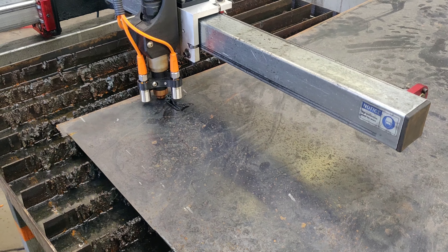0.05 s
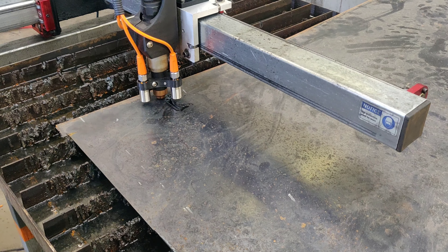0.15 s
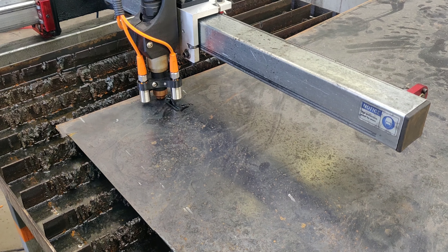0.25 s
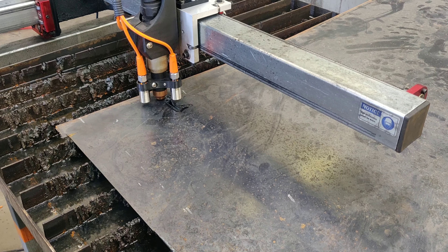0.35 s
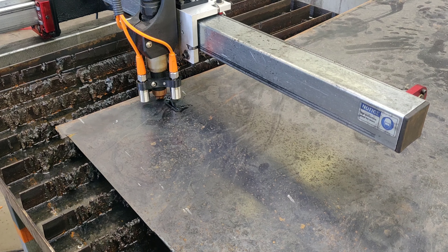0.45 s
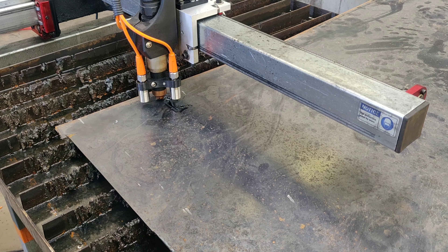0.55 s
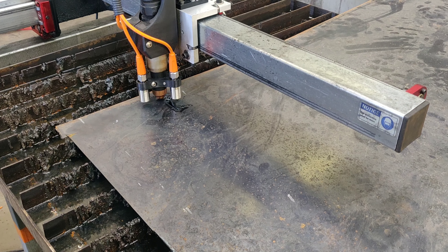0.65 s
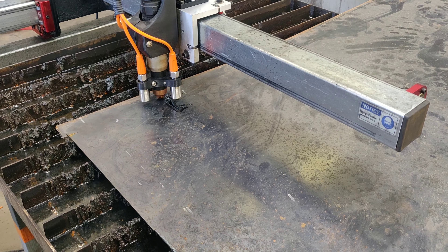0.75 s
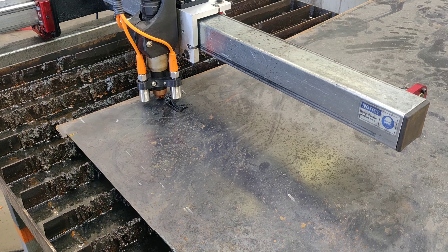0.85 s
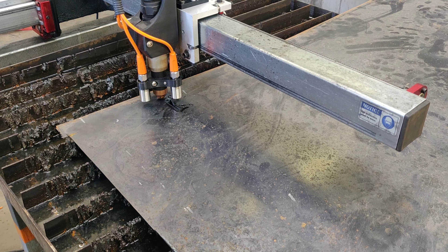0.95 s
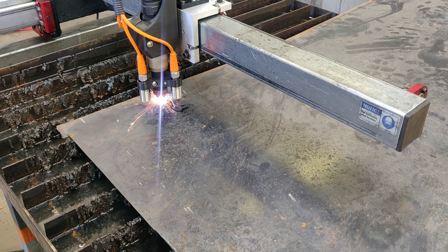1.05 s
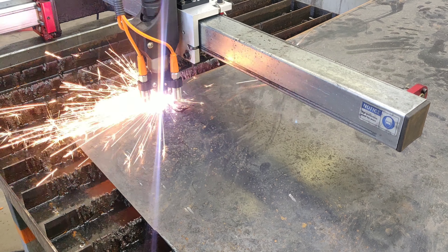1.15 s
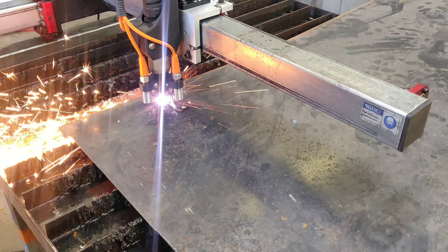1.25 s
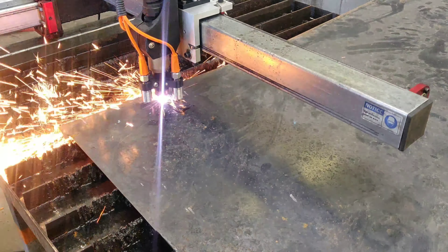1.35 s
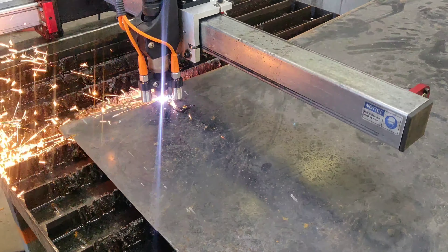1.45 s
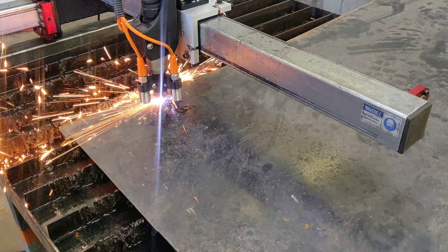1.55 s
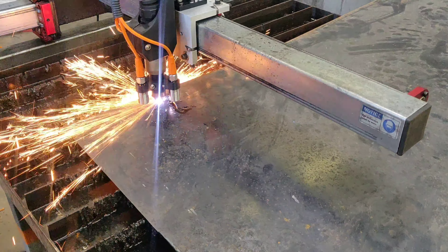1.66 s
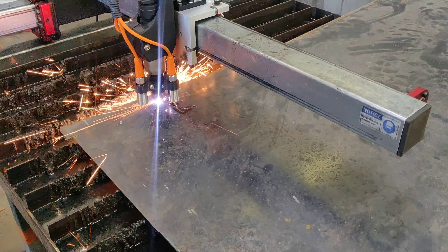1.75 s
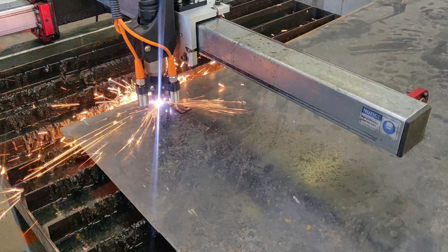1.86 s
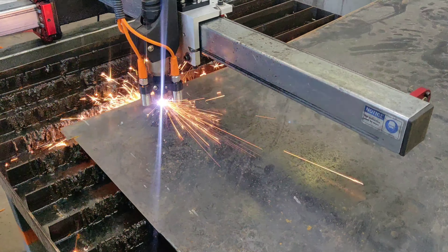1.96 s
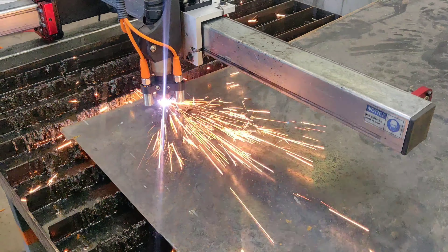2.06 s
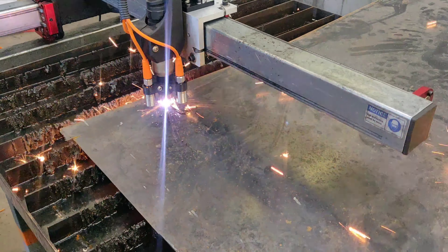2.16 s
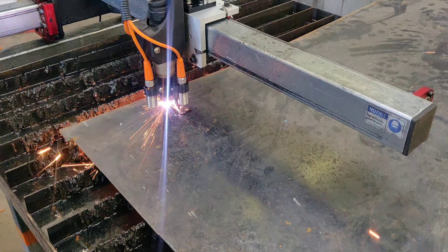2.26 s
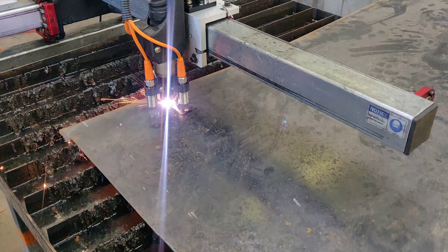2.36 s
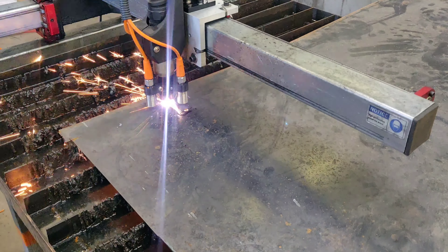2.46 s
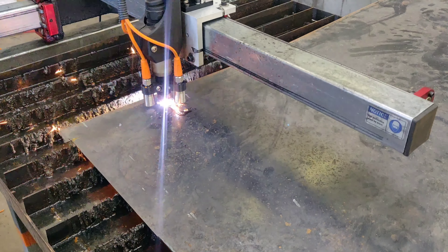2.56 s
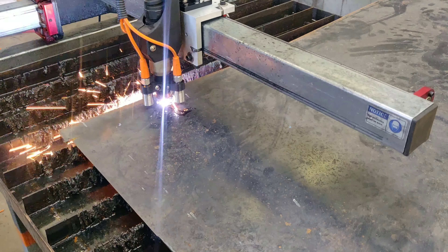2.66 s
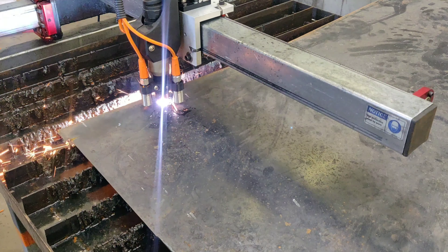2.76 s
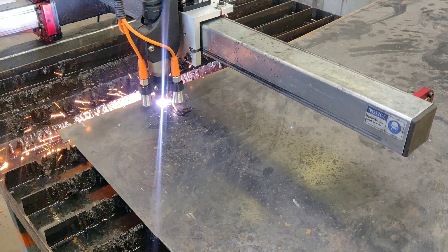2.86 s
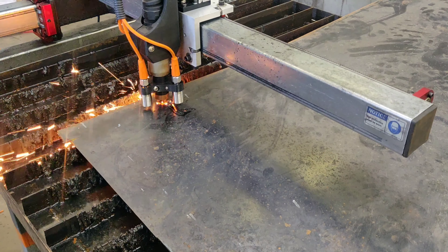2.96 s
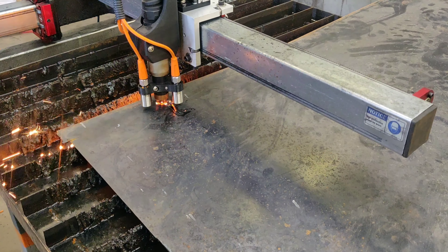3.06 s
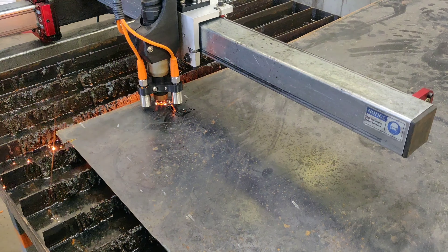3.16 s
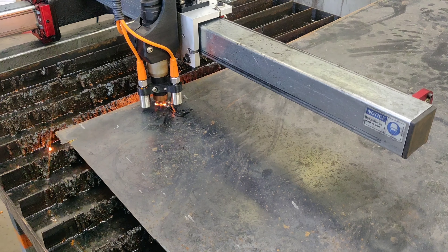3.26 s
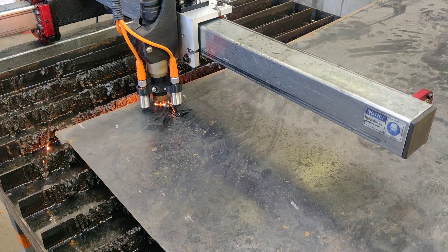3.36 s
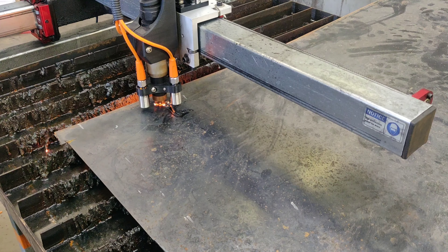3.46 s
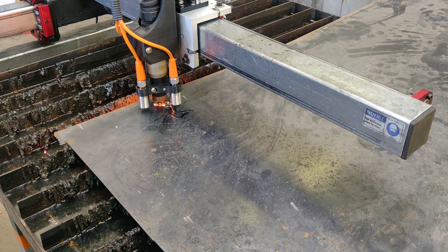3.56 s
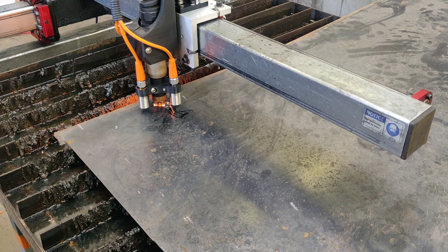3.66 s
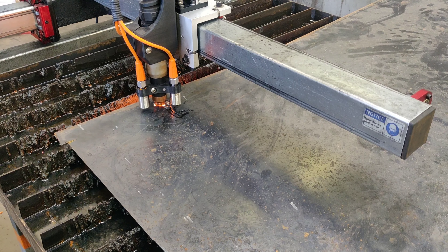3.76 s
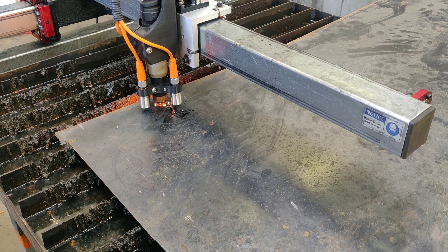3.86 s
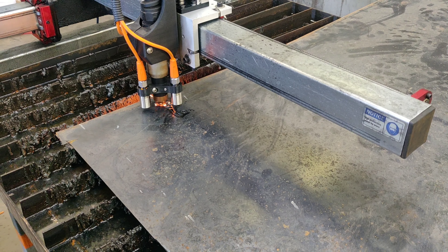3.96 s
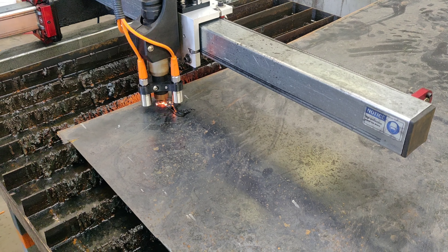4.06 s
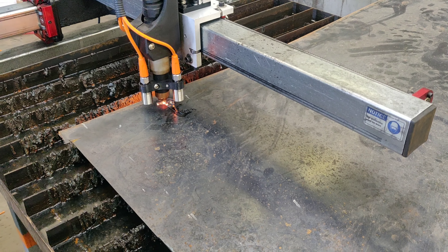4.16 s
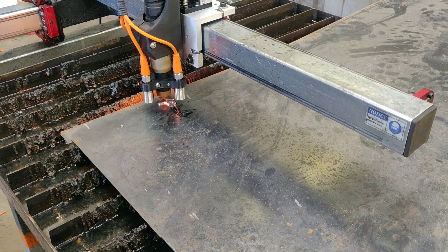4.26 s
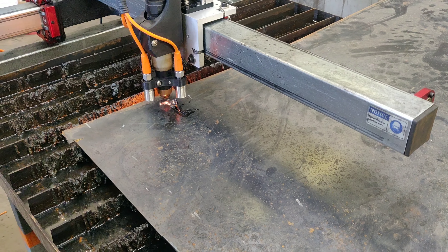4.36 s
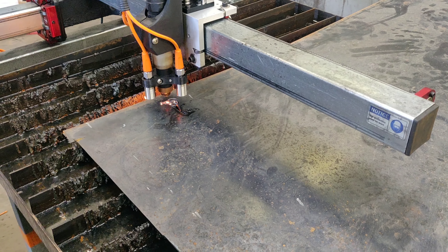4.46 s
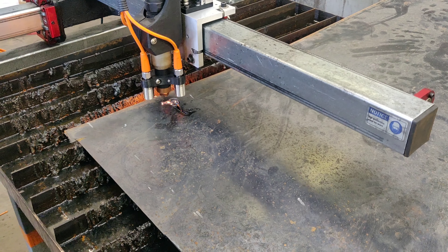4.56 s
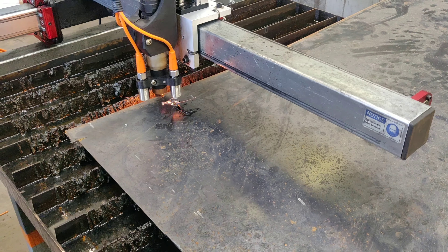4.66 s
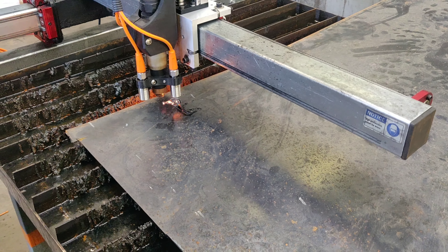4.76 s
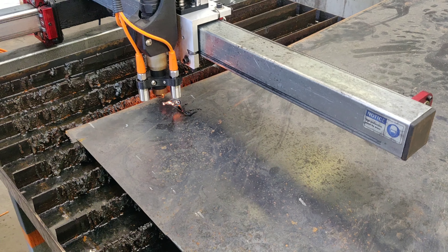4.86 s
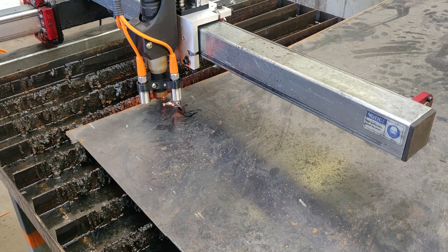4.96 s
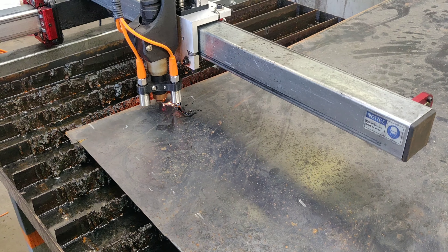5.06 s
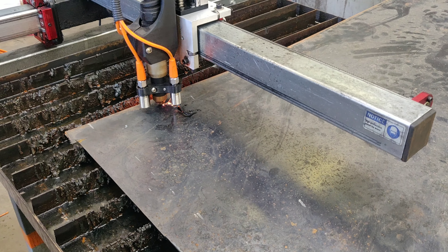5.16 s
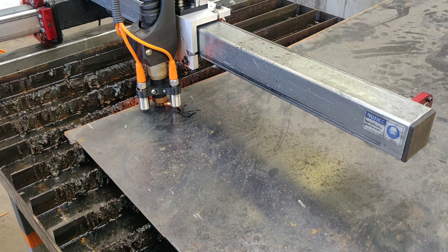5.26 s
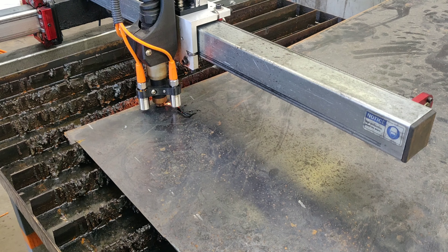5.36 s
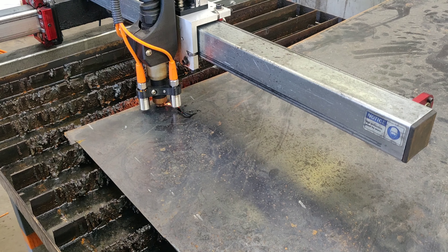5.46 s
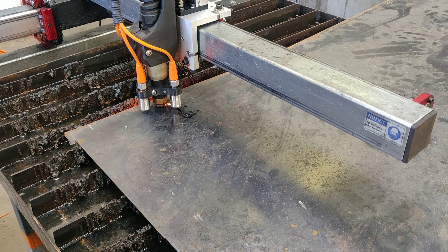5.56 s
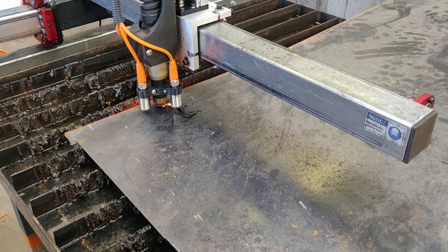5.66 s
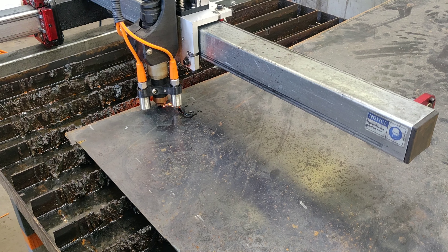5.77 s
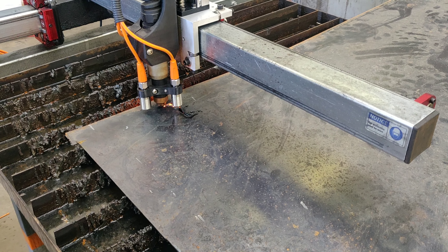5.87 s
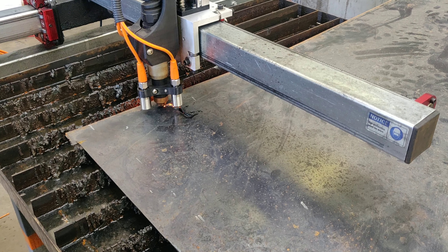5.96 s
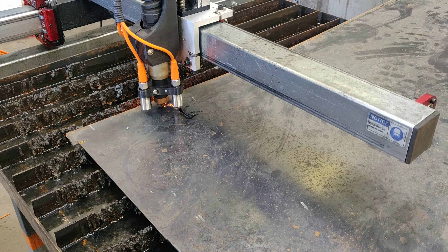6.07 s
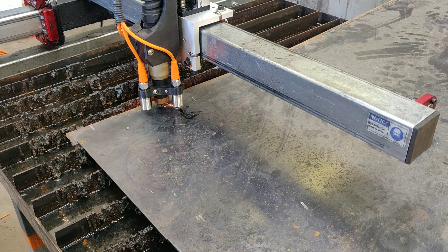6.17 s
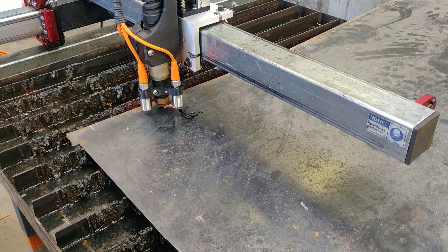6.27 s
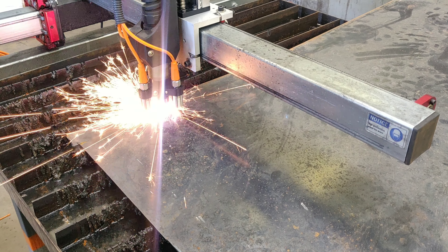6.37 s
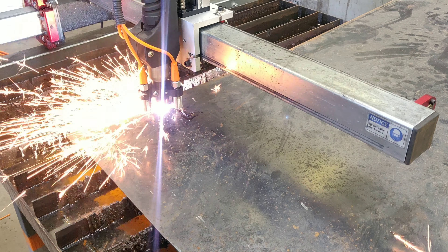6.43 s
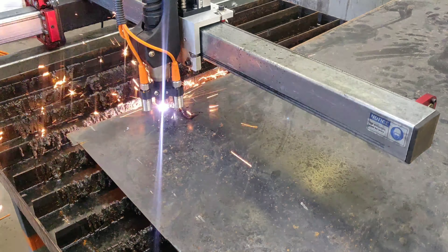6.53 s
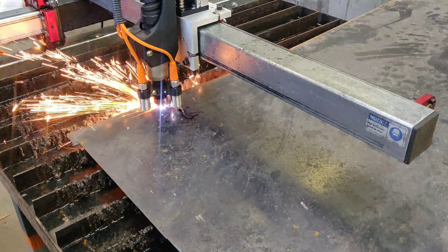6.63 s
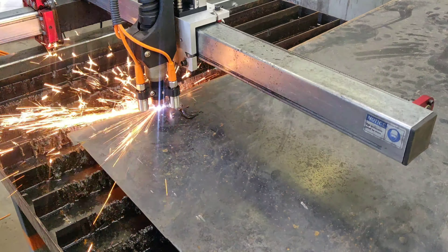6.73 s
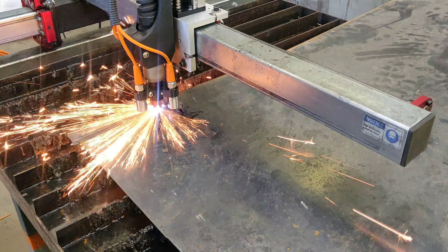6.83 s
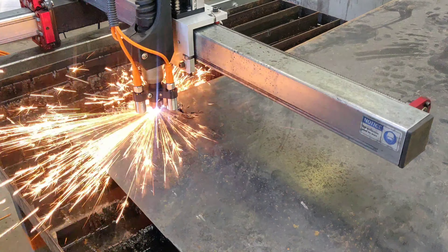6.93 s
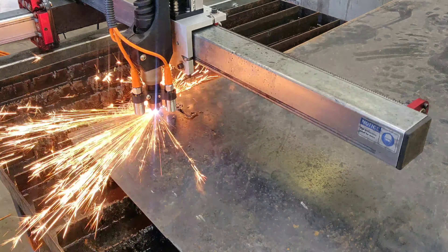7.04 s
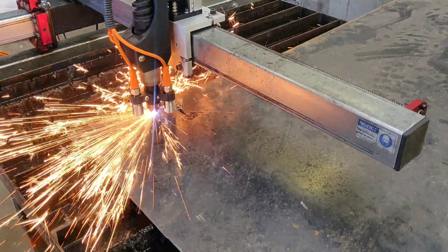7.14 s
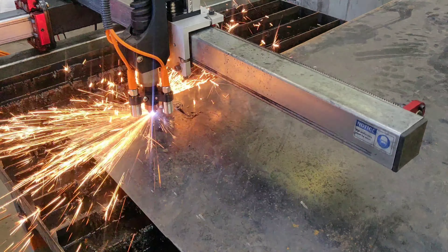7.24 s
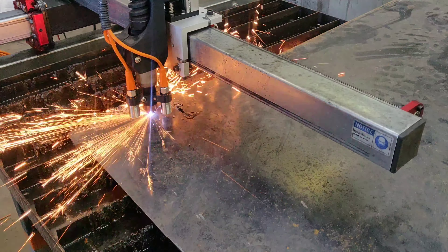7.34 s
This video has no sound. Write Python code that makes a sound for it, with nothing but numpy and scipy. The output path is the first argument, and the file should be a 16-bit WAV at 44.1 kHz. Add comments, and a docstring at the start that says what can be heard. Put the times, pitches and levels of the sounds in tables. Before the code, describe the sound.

Close stereo view of a plasma torch over a steel plate in a workshop. Compressed air hisses and bleeds away over low machine hum, then a sharp snap starts a fierce sizzling, sputtering roar for about two seconds. It drops to a breathy, whistling air hiss that rushes briefly, then dies down. A second snap, thump and roar run to the end.

```python
"""Cold air hisses from a plasma torch over a workshop hum, then bleeds away; the torch cuts steel plate twice.
Air, arc and kerf are coloured noise at two microphone ports; hum, drones and whistle are wavering tones.
Each arc strikes with a snap, pierces, sputters and roars; the cold jet hisses and whistles between the cuts.
The blast pushes mostly on the right port; gain control ducks the whole sound when it is loud."""
import sys
import numpy as np
from scipy import signal
from scipy.fft import rfft, irfft
from scipy.io import wavfile
from scipy.ndimage import uniform_filter1d

SR = 44100
rng = np.random.default_rng(int(sys.argv[2]) if len(sys.argv) > 2 else 0)


def master_out(mix):
    """Clip the mix to full scale and print it as 16-bit PCM to the path in sys.argv[1]."""
    frames = np.transpose(np.atleast_2d(mix))
    ceiling = np.clip(frames, -1, 1)
    pcm = np.round(ceiling * 32767).astype(np.int16)
    wavfile.write(sys.argv[1], SR, pcm)


N = 326340
TIME = np.arange(N) / SR
FRAME, HOP = 512, 128  # samples
FRAME_S = np.arange(N // HOP + 5) * HOP / SR
BIN_HZ = np.fft.rfftfreq(FRAME, 1 / SR)


def gain_of(db):
    """Decibels to amplitude."""
    return 10 ** (np.asarray(db) / 20)


def evened(x):
    """Scales to rms 1."""
    return x / np.sqrt(np.mean(x ** 2) + 1e-20)


def curve(table, t):
    """Linear interpolation of a two-column table over time."""
    return np.interp(t, *np.transpose(table))


def read(table, hz):
    """Every column of a spectrum table, interpolated over log frequency."""
    table_hz, *columns = np.transpose(table)
    return [np.interp(np.log(hz + 1), np.log(table_hz + 1), column) for column in columns]


def wander(hz):
    """Slow random modulation of rms 1, up to about hz."""
    f = np.fft.rfftfreq(N, 1 / SR)
    spectrum = rfft(rng.standard_normal(N)) / (1 + (f / hz) ** 4)
    return evened(irfft(spectrum, N))


def gate(start, end, rise, fall):
    """One between two times, with straight ramps; the fall is centred on the end."""
    return np.clip((TIME - start) / rise, 0, 1) * np.clip((end - TIME) / fall + .5, 0, 1)


def bell(centre_hz, octaves):
    """A smooth band on the frame bins."""
    return np.exp(-.5 * (np.log2((BIN_HZ + 1) / centre_hz) / octaves) ** 2)


def bursts(table):
    """Gaussian amplitude swells from rows of time, level and half length."""
    return sum(gain_of(db) * np.exp(-.5 * ((TIME - s) / half_s) ** 2) for s, db, half_s in table)


# Torch nearer the left port. Each row: frequency in Hz, left lead in radians.
PORT_LEAD = [(100, 0), (850, .1), (1300, 1.2), (1850, 1.6), (2300, 3.1), (3000, 3.15), (4800, 3.1),
             (5600, 2.3), (6400, 2.5), (7500, 3.5), (8600, 3.9), (9300, 6.2), (9900, 6.8), (10500, 9.4),
             (10850, 9.4), (11150, 12.4), (12300, 13.2), (13500, 14.8), (14100, 13.5), (15400, 15.6)]
# Colour of the ports. Each row: frequency in Hz, width in Hz, lift in dB.
PORT_RESONANCES = [(10600, 400, -3), (15450, 600, 1), (15300, 400, -2)]


def port_noise(table, band_hz, modes=()):
    """Turbulence as the two ports hear it; their mean has rms 1 within the band."""
    hz = np.fft.rfftfreq(N, 1 / SR)
    left_db, right_db, likeness = read(table, hz)
    likeness = np.clip(likeness, 0, 1)
    common, other = rfft(rng.standard_normal((2, N)))
    right = likeness * common + np.sqrt(1 - likeness ** 2) * other
    right = right * np.exp(-1j * read(PORT_LEAD, hz)[0])
    lift_db = sum(db / (1 + (2 * (hz - f) / width) ** 2) for f, width, db in [*modes, *PORT_RESONANCES])
    ports = np.array([common * gain_of(left_db), right * gain_of(right_db)]) * gain_of(lift_db)
    in_band = (hz > band_hz[0]) * (hz < band_hz[1])
    return irfft(ports, N) / np.std(irfft(ports.mean(0) * in_band, N))


def swirl(x, field_db, patchy_db):
    """Lays a moving colour and narrow random eddies, some 250 Hz by 40 ms, on a sound."""
    z = signal.stft(x, nperseg=FRAME, noverlap=FRAME - HOP)[2]
    eddies = rng.standard_normal((len(FRAME_S), len(BIN_HZ)))
    eddies = uniform_filter1d(eddies, size=14, axis=0)
    eddies = evened(uniform_filter1d(eddies, size=3, axis=1))
    z = z * gain_of(field_db + patchy_db * eddies).T[:, :z.shape[-1]]
    return signal.istft(z, nperseg=FRAME, noverlap=FRAME - HOP)[1][:, :N]


# Each row: gas valve opens in seconds, arc strikes in seconds, arc goes out in seconds.
CUTS = [(1.119, 1.149, 2.985), (6.369, 6.398, 7.5)]
# Valve shuts off the cooling air. Each entry: time in seconds.
AIR_SHUT_OFFS = [0.75, 6.005]
BLEED_S, BLEED_DB_PER_DECADE = 0.17, 70


def pressure_db(t):
    """Air pressure: full while the valve is open, bleeding away from each shut-off to the next strike."""
    shut_s = sum(np.maximum(t - shut, 0) * (t < strike) for shut, (_, strike, _) in zip(AIR_SHUT_OFFS, CUTS))
    return -BLEED_DB_PER_DECADE * np.log10(1 + shut_s / BLEED_S)


# Torch travel over the fresh slot. Each row: time in seconds, meeting from 0 (bare plate) to 1 (on the edge).
SLOT_MEETING = [(1.1, .15), (3, 0.45), (3.5, 0.46), (4.2, 0.43), (4.35, 0.61), (4.55, 0.95), (4.67, 0.7),
                (4.705, 0.97), (4.745, 1), (4.78, 0.66), (4.95, 0.14), (5.7, 0.18), (6, 0.17)]


def over_slot(t):
    """How squarely the cold jet meets the slot, 0 to 1."""
    return np.clip(curve(SLOT_MEETING, t), 0, 1)


# Cold jet spectrum. Each row: frequency in Hz, left in dB, right in dB, left-right likeness from 0 to 1.
AIR_SPECTRUM = [(120, -38, -41, .99), (480, -20, -17.5, 0.79), (750, -16, -15, 1), (1090, -17.5, -14, 0.49),
                (2130, -14, -9.5, 0.35), (2380, -11.5, -12.5, 0.38), (2460, -22, -11.5, 1),
                (2840, -15, -15, 0.93), (3180, -13, -10.5, 0.17), (4400, -7.5, -15.5, 0.26),
                (4680, -12.5, -8.5, 0.27), (5370, -5, -12, 0.17), (5950, -1, -9, 0.52),
                (6700, 1, 0.5, 0.74), (6920, -5.5, -1.5, 0.55), (7450, -7.5, 0, 0.62),
                (7870, -7, -8.5, .25), (8200, -10.5, -6.5, 0.32), (8900, -17, -6, .2),
                (9300, -17.5, -9, 0.22), (10300, -13, -12, .2), (10750, -14, -15, 0.47),
                (10970, -18.5, -12, .3), (12800, -7.5, -7.5, .3), (13800, -6.5, -7, .2),
                (14900, -7.5, -3.5, 0.29)]
# Gap under the torch. Each row: resonance in Hz, width in Hz, lift in dB.
GAP_RESONANCES = [(780, 190, 4), (1860, 280, 2.5), (6670, 250, 3), (5150, 200, 4), (7160, 140, 1)]
AIR_DB, PREFLOW_DB = -41.5, -53
RUSH_DB, FIZZ_DB = 9.5, 4  # mid-band and treble lift squarely on the slot edge


def air(burning):
    """Cold air turbulence from the nozzle; as pressure bleeds off, the treble dies first."""
    sag_db = pressure_db(FRAME_S)[:, None]
    dulling_db = np.minimum(sag_db + 10.5, 0) * (((BIN_HZ + 1) / 6500) ** 0.43 - 1)
    edge_db = RUSH_DB * bell(1870, 0.94) + FIZZ_DB * bell(10800, 0.24)
    rush_db = over_slot(FRAME_S)[:, None] ** 2 * edge_db
    jet = port_noise(AIR_SPECTRUM, (5000, 8000), GAP_RESONANCES)
    eddy_db = 1.36 + 2.15 * bell(2470, .5)
    flow = swirl(jet, AIR_DB + sag_db + dulling_db + rush_db, patchy_db=eddy_db)
    flow = flow * gain_of(.2 * wander(30))
    preflow = sum(gate(valve, strike, 0.025, .004) for valve, strike, _ in CUTS)
    return flow * (1 - burning) + gain_of(PREFLOW_DB) * preflow * jet


# Cold jet whistle. Each row: time in seconds, pitch in Hz, level at full pressure in dB.
WHISTLE_TRACK = [(0, 2580, -67), (.7, 2640, -59), (3, 2740, -46), (3.2, 2740, -43.5), (4.15, 2710, -46.5),
                 (4.4, 2680, -43), (4.72, 2650, -44), (4.8, 2620, -55), (5.2, 2640, -62), (5.5, 2550, -59),
                 (6, 2650, -56)]
WHISTLE_WIDTH_HZ, WHISTLE_WAVER_HZ, WHISTLE_LEAD_RAD = 150, 18, 2.7


def whistle(burning):
    """A breathy, wavering resonance of the cold jet, reaching the ports in nearly opposite phase."""
    times, pitch_hz, level_db = np.transpose(WHISTLE_TRACK)
    offset_hz = np.fft.fftfreq(N, 1 / SR)
    a, b = rng.standard_normal((2, N))
    ring = np.fft.ifft((a + 1j * b) / (1 + (2 * offset_hz / WHISTLE_WIDTH_HZ) ** 2))
    turns = np.cumsum(np.interp(TIME, times, pitch_hz) + WHISTLE_WAVER_HZ * wander(6.4)) / SR
    left = ring * np.exp(2j * np.pi * turns)
    tone = evened(np.real([left, left * np.exp(-1j * WHISTLE_LEAD_RAD)]))
    tone_db = np.interp(TIME, times, level_db) + pressure_db(TIME) + 0.65 * wander(16.0)
    return tone * gain_of(tone_db) * (1 - burning)


# Machine hum. Each row: multiple of the shaft rate, rms before the swell in dB.
HUM_LINES = [(1, -56), (2, -60.5), (3, -61), (4, -64.5)]
SHAFT_HZ = 90
# Each row: time in seconds, swell of the lowest hum line in dB.
HUM_SWELL = [(0, -2.5), (.45, 3.5), (.75, -4.5), (1.1, 3), (2.3, -7), (3, -4), (3.5, 5.5), (3.9, -1.5),
             (4.25, 2), (4.5, 0), (5.7, 0.5), (6.2, -2), (7.4, -1)]
# Mains and other machines. Each row: frequency in Hz, rms in dB.
DRONES = [(60, -69), (186, -64), (225, -68), (235.5, -64.5), (281.2, -65)]
# Room rumble spectrum. Each row: frequency in Hz, left in dB, right in dB, left-right likeness from 0 to 1.
ROOM_SPECTRUM = [(25, -10, -10, .9), (55, -5, -5, .9), (130, -2, -2, .9), (230, -1, -1, .85),
                 (330, -2, -3, .8), (480, -9, -9, .7), (800, -15, -14, .5), (1500, -21, -19, .3),
                 (3000, -26, -24, .1), (6500, -29, -30, .05), (10000, -42, -42, .05), (15000, -41, -41, .1)]
# Low room resonances. Each row: frequency in Hz, width in Hz, lift in dB.
ROOM_RESONANCES = [(157, 18, 5), (244, 11, -6.5)]


def workshop():
    """Hum harmonics and steady tones in the room's rumble; the swell moves the lowest line most."""
    turns = np.cumsum(SHAFT_HZ * (1 + .003 * wander(3))) / SR
    tones, swell_db = np.zeros(N), curve(HUM_SWELL, TIME)
    for k, db in HUM_LINES:
        phase = 2 * np.pi * (k * turns + rng.random()) + .12 * wander(10)
        tones += np.sqrt(2) * gain_of(db + swell_db / k + 2.0 * wander(13)) * np.sin(phase)
    for hz, db in DRONES:
        phase = 2 * np.pi * (hz * TIME + rng.random()) + .5 * wander(3.3)
        tones += np.sqrt(2) * gain_of(db) * np.sin(phase)
    rumble = port_noise(ROOM_SPECTRUM, (30, 16000), ROOM_RESONANCES)
    return tones * gain_of([[.3], [-.7]]) + gain_of(-53.5 + 1.0 * wander(34)) * rumble


def shock(s):
    """One small shock wave: a sharp push and a weaker pull."""
    u = np.maximum(TIME - s, 0) / 0.00024
    return (u > 0) * (1 - u) * np.exp(-u)


def ignition():
    """Each strike is one small shock wave and a short flare of noise, 1 ms after the arc starts."""
    snaps_s = [strike + .001 for _, strike, _ in CUTS]
    snap = sum(shock(s) for s in snaps_s)
    flare = sum((TIME > s) * np.exp(-abs(TIME - s) / .003) for s in snaps_s)
    return gain_of(-22) * snap + gain_of(-33) * flare * rng.standard_normal((2, N))


# Hot jet spectrum. Each row: frequency in Hz, left in dB, right in dB, left-right likeness from 0 to 1.
ARC_SPECTRUM = [(100, -15.5, -11, .63), (300, -19.5, -7.5, 0.24), (704, -5.5, -6.5, 0.53),
                (1960, -10.5, -3.5, 0.26), (2400, -13, -4.5, 0.58), (2830, -5.5, -22, 1),
                (3170, -10, -5, .15), (4050, -7, -13, 0.39), (4500, -12.5, -10, 0.3),
                (5440, -5.5, -10.5, .1), (6750, 1, -1, 0.16), (7300, -2.5, -0.5, .35), (7850, -10, -5, .2),
                (8500, -11.5, -7, .2), (10200, -11.5, -5.5, .2), (10750, -8, -9.5, .5), (11800, -9, -6, .2),
                (12500, -7, -5, .2), (13600, -6.5, -8, .15), (14670, -0.5, 2, 0.47)]
# Nozzle band against the sizzle. Each row: time in seconds, level in dB.
NOZZLE_BAND = [(1.16, -3), (1.32, 1), (1.38, 0), (1.48, 3), (1.68, 0.5), (1.83, 0), (2.37, -0.5),
               (2.46, -1), (2.97, 0), (6.4, -5), (6.65, 1.5), (7.25, 0), (7.31, 3.5), (7.4, 3)]
# Arc falters breaking through the plate and surges along the cut.
# Each row: time in seconds, half length in seconds, change in dB.
FALTERS = [(1.184, 0.02, -5.5), (1.291, 0.0093, -6), (1.383, 0.038, -6.5), (1.813, 0.068, 3.2),
           (2.36, 0.039, 4), (6.535, 0.027, -2.5)]
SIZZLE_DB, SIZZLE_FLUTTER_DB, NOZZLE_FLUTTER_DB = -36, 0.76, 0.15
PIERCE_S, PIERCE_DB, PIERCE_BRIGHT_DB = .16, 4.2, 6


def arc():
    """Hot jet turbulence sizzles and flutters; it is louder and brighter while it pierces."""
    t = FRAME_S[:, None]
    piercing = sum((t > valve) * np.exp(-((t - strike) / PIERCE_S) ** 2) for valve, strike, _ in CUTS)
    nozzle_db = curve(NOZZLE_BAND, t) + NOZZLE_FLUTTER_DB * np.interp(t, TIME, wander(8.6))
    pierce_db = piercing * (PIERCE_DB + PIERCE_BRIGHT_DB * bell(9500, 0.14))
    field_db = nozzle_db * bell(6900, 0.85) + pierce_db
    falter_db = sum(db * np.exp(-((TIME - s) / half_s) ** 2) for s, half_s, db in FALTERS)
    flutter_db = SIZZLE_FLUTTER_DB * wander(4.7) + 0.5 * wander(45)
    jet = port_noise(ARC_SPECTRUM, (11000, 16000))
    eddy_db = 1.2 + 2.2 * bell(3800, .6)
    return swirl(jet, field_db, patchy_db=eddy_db) * gain_of(SIZZLE_DB + falter_db + flutter_db)


def crackle():
    """Sparks tick on the steel at random, some 70 a second, a few of them large."""
    size = gain_of(3.5 * np.minimum(rng.exponential(1, N), 4.5)) * (rng.random(N) < 70 / SR)
    t = TIME[:round(.01 * SR)]
    tick = rng.standard_normal((2, len(t))) * np.exp(-t / 0.00041)
    return gain_of(-58) * signal.oaconvolve(size[None], tick, axes=1)[:, :N]


# Slot roar spectrum. Each row: frequency in Hz, left in dB, right in dB, left-right likeness from 0 to 1.
KERF_SPECTRUM = [(50, -44, -34, .5), (150, -13, -42, .5), (446, -16, -23, 0.65), (730, -3, -5, 1),
                 (970, -8.5, -5.5, 0.72), (1245, -2, 0, 0.96), (1380, -7, -5.5, 1), (1690, -8.5, -7, 0.38),
                 (2650, -13.5, -14.5, 0.3), (4970, -24.5, -35, 0.22)]
# Each row: kerf resonance in Hz, width in Hz, lift in dB.
KERF_RESONANCES = [(745, 80, 2.8), (920, 24, 7), (1140, 100, 1.5), (1295, 48, 6), (1375, 35, 3.5)]
# Jet across the cut edge. Each row: time in seconds, roar in dB before the grazing factor and lift.
ROAR = [(1.155, -49), (1.32, -43.5), (1.68, -45), (1.8, -39.5), (2.14, -40.5), (2.29, -47), (2.38, -45),
        (2.41, -36.5), (2.52, -37.5), (2.615, -33), (2.68, -44.5), (2.97, -44.5), (6.41, -54), (6.545, -46),
        (6.565, -36), (6.9, -34.5), (6.97, -41), (7.25, -43.5), (7.31, -41.5)]
# Main resonance as the slot opens. Each row: time in seconds, pitch in Hz.
KERF_PITCH = [(1.7, 1160), (2.1, 1270), (2.38, 1300), (2.47, 1380), (2.62, 1270), (2.97, 1260),
              (6.56, 1220), (6.68, 1420), (6.88, 1380), (7, 1230)]


def kerf():
    """The jet roars in the slot it cuts; the harder it grazes the edge, the more a shifting resonance stands out."""
    roar_db = curve(ROAR, TIME)
    grazing = np.clip((roar_db + 51.5) / 11, .05, 1)
    centre_hz = curve(KERF_PITCH, FRAME_S)[:, None]
    lift_db = np.clip(.5 * (np.interp(FRAME_S, TIME, roar_db)[:, None] + 49.5), 0, 6)
    jet = port_noise(KERF_SPECTRUM, (900, 1700), KERF_RESONANCES)
    roar = swirl(jet, lift_db * (bell(centre_hz, .11) - .55), patchy_db=1.5)
    return roar * grazing * gain_of(roar_db + 5.5 + 0.58 * wander(29) + 0.22 * wander(69))


# Big spurts of molten metal. Each row: peak in seconds, level in dB, half length in seconds.
BIG_SPURTS = [(1.176, -38, 0.0052), (1.227, -30.5, 0.01), (1.244, -33, 0.013), (1.386, -34.5, 0.008),
              (1.42, -40, 0.011), (1.483, -39.5, 0.03), (1.6, -29.5, 0.0083), (1.638, -39, 0.0032),
              (1.9, -48, 0.0046), (1.972, -43, 0.0047), (2.13, -37, .008), (2.539, -39, .005),
              (2.603, -34.5, .011), (2.745, -36.5, 0.016), (2.85, -37.5, .005), (2.977, -35.5, .004),
              (6.477, -29, 0.019), (6.509, -29.5, 0.0095), (6.993, -34, 0.0096), (7.031, -33.5, 0.011),
              (7.303, -37, 0.0088)]
# Melt spray spectrum. Each row: frequency in Hz, left in dB, right in dB, left-right likeness from 0 to 1.
SPUTTER_SPECTRUM = [(30.6, -2, 2, 0.31), (125, -9, 8.5, 1), (343, 4, 9.5, 0.39), (740, -8.5, 8.5, 0.92),
                    (1520, -8, -0.5, 0.73), (2670, -3, 1, 0.25), (8000, -14, -15.5, 0.13),
                    (15000, -9, -24, .2)]
SPURTS_PER_S, SPURT_DB, SPURT_S = 6, -45.5, 0.0057  # small random spurts


def sputter():
    """Melt leaves in big spurts and small random ones over fluctuating light spitting; their powers add."""
    big = sum(gain_of(db) ** 2 * np.exp(-((TIME - s) / half_s) ** 2) for s, db, half_s in BIG_SPURTS)
    spurt = np.exp(-((TIME[:SR // 10] - .05) / SPURT_S) ** 2)
    starts = 1. * (rng.random(N) < SPURTS_PER_S / SR)
    small = gain_of(SPURT_DB) ** 2 * abs(signal.oaconvolve(starts, spurt, "same"))
    spitting = gain_of(-44.5 + 3.9 * wander(39)) ** 2
    spray = port_noise(SPUTTER_SPECTRUM, (100, 3000))
    return spray * np.sqrt(big + small + spitting) * gain_of(0.95 * wander(170))


# Jet thrown back by the plate. Each row: peak in seconds, level before port gain in dB, half length in seconds.
THUMPS = [(1.213, -46, 0.02), (1.615, -50, 0.0084), (6.493, -36, 0.023)]


def thumps():
    """Short bursts of low turbulence, stronger on the right port."""
    band = signal.butter(2, [35, 160], "band", fs=SR, output="sos")
    low = signal.sosfilt(band, rng.standard_normal((3, N)))
    return bursts(THUMPS) * evened(low[:2] + low[2]) * gain_of([[-4], [2]])


# Each row: start in seconds, right-port push before rise and decay in dB, swing in Hz, decay in seconds.
GUSTS = [(1.264, -18, 8, 0.026), (6.497, -13.5, 2.86, 0.18)]


def gusts():
    """The piercing blast pushes on the right port, which swings slowly back; the left gets 24 dB less."""
    push = np.zeros(N)
    for s, db, hz, decay_s in GUSTS:
        age = np.maximum(TIME - s, 0)
        swing = np.cos(2 * np.pi * hz * age) * np.exp(-age / decay_s)
        push += gain_of(db) * (1 - np.exp(-age / 0.024)) * swing
    return push * gain_of([[-24], [0]])


# Single bursting drops. Each row: time in seconds, level in dB.
POPS = [(1.419, -23), (1.8, -21), (2.359, -24), (6.642, -22)]


def pops():
    """Drops of melt burst in the cut, each an inverted shock wave."""
    return -sum(gain_of(db) * shock(s) for s, db in POPS)


# Cold jet crossing the slot edge. Each row: peak in seconds, level in dB, half length in seconds.
CHUFFS = [(4.55, -51, .07), (4.73, -44, .028)]


def chuffs():
    """Short swells of mid-band turbulence from the edge of the slot."""
    band = signal.butter(2, [1250, 2750], "band", fs=SR, output="sos")
    rush = signal.sosfilt(band, rng.standard_normal((3, N)))
    return bursts(CHUFFS) * evened(rush[:2] + 0.72 * rush[2])


ECHO_DRIFT_S, ECHO_DRIFT_HZ = .00005, 0.91  # torch travel and microphone sway


def reflections(x, echo_db):
    """Early echoes from plate and gantry comb the hiss; their paths drift, differently at each port."""
    echoes = np.zeros((2, N))
    for port, sound in zip(echoes, x):
        for delay_s in rng.uniform(.001, .006, size=4):
            path_s = delay_s + ECHO_DRIFT_S * wander(ECHO_DRIFT_HZ)
            port += rng.choice([-.5, .5]) * np.interp(TIME - path_s, TIME, sound)
    echoes = signal.sosfilt(signal.butter(1, 1800, "high", fs=SR, output="sos"), echoes)
    return (x + gain_of(echo_db) * echoes) / np.hypot(1, gain_of(echo_db))


def hall(x, t60_s):
    """The diffuse tail of the workshop, unrelated at the two ports and dull in the treble."""
    t = TIME[:SR // 2]
    tail = rng.standard_normal((2, len(t))) * (t > .012) * gain_of(-60 * t / t60_s)
    tail /= np.linalg.norm(tail[0])
    tail = signal.sosfilt(signal.butter(2, 4000, fs=SR, output="sos"), tail)
    return signal.oaconvolve(x, tail, axes=1)[:, :N]


def scene():
    """Air and arc take turns over the workshop hum."""
    burning = sum(gate(strike, out, 0.0025, 0.008) for _, strike, out in CUTS)
    hiss = air(burning) + burning * (arc() + crackle())
    torch = reflections(hiss, echo_db=-14)
    melt = burning * (kerf() + sputter() + pops())
    tail = gain_of(-14.5) * hall(melt + gain_of(3.5) * torch, t60_s=0.49)
    return torch + whistle(burning) + workshop() + ignition() + melt + tail + thumps() + gusts() + chuffs()


THRESHOLD_DB, DUCK_RANGE_DB, RECOVERY_DB_PER_S = -32.5, 7.0, 20.0
BAND_LIMIT_HZ = 15790


def record(dry):
    """Gain control of limited range falls quickly and recovers slowly; then the band limit."""
    power = abs(uniform_filter1d((dry ** 2).mean(0), size=400))
    power_db = 10 * np.log10(power + 1e-12)
    over_db = np.clip(power_db - THRESHOLD_DB, 0, DUCK_RANGE_DB)
    recovery_db = TIME * RECOVERY_DB_PER_S
    held_db = np.maximum.accumulate(over_db + recovery_db) - recovery_db
    ducked = dry / gain_of(uniform_filter1d(held_db, size=200))
    low_pass = signal.firwin(611, BAND_LIMIT_HZ, window=("kaiser", 8), fs=SR)
    return signal.oaconvolve(ducked, low_pass[None], "same")


dry = scene()
out = record(dry)
master_out(out)
```